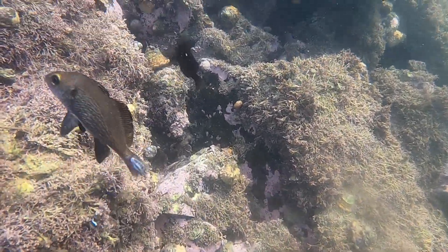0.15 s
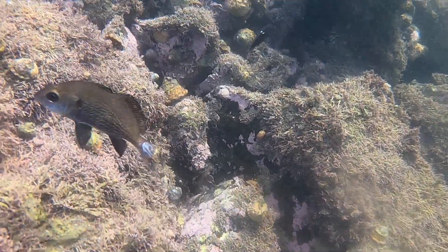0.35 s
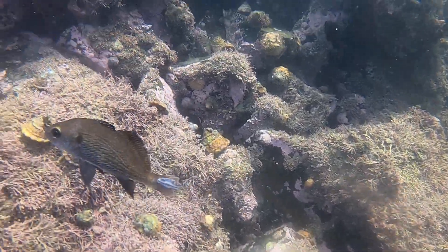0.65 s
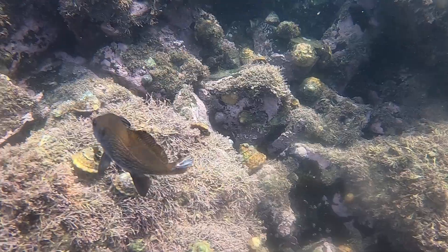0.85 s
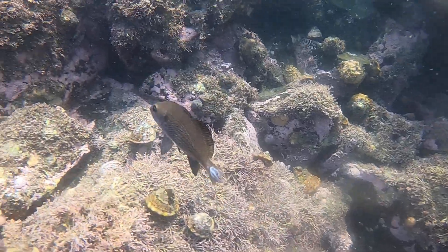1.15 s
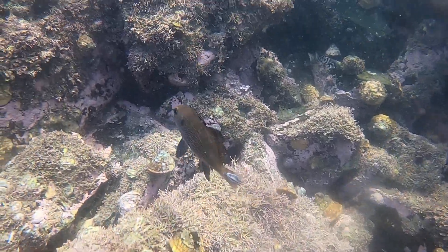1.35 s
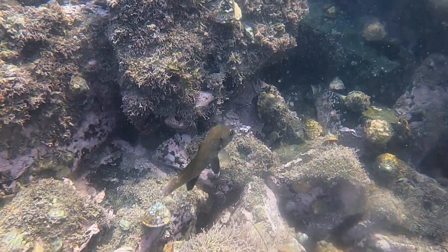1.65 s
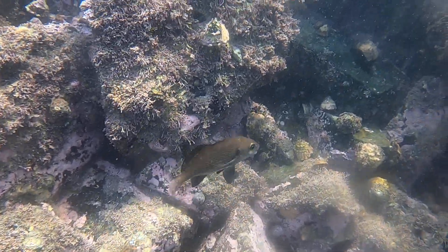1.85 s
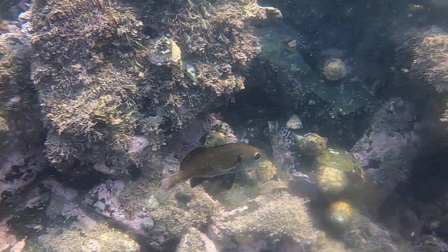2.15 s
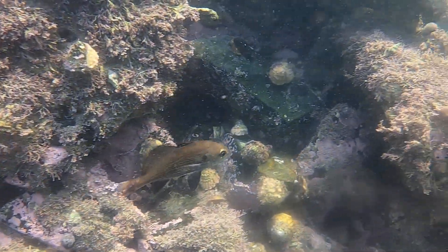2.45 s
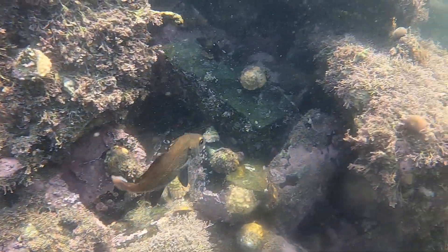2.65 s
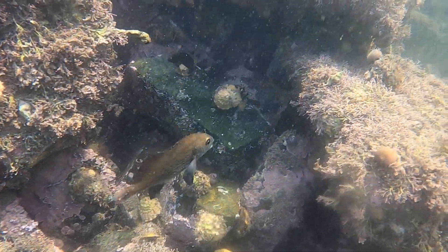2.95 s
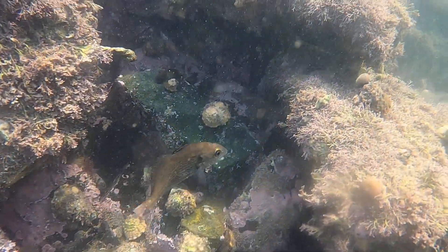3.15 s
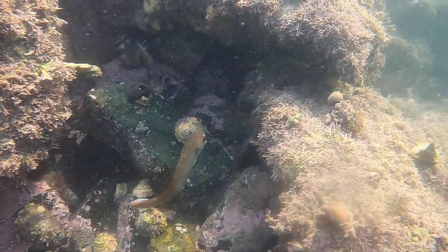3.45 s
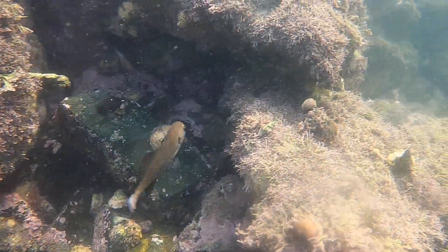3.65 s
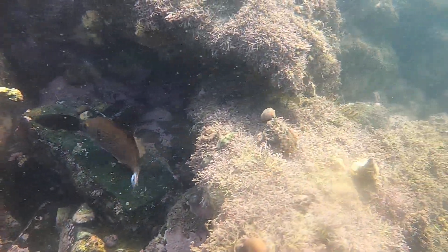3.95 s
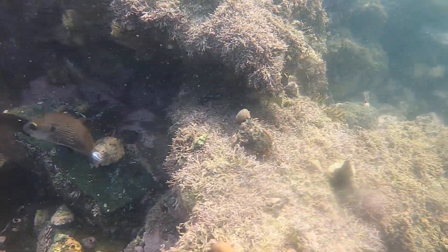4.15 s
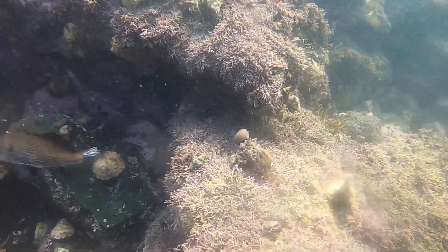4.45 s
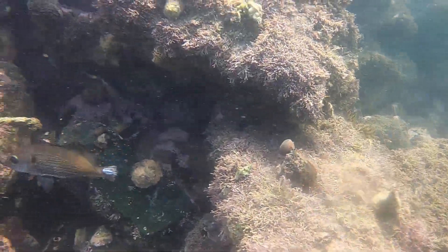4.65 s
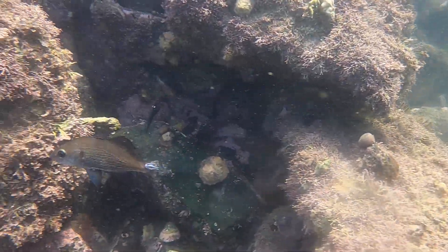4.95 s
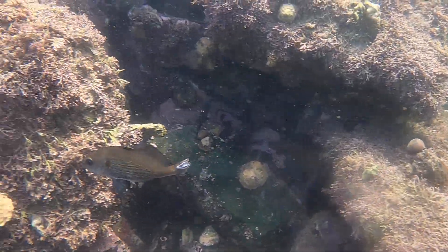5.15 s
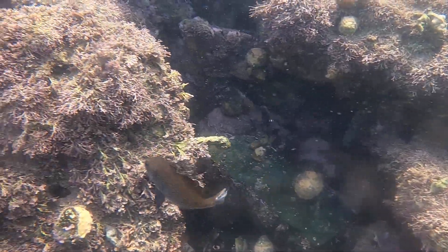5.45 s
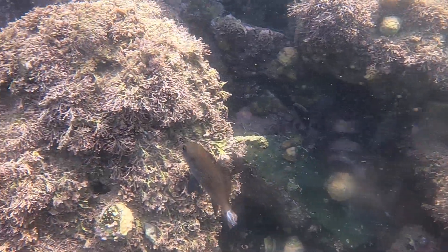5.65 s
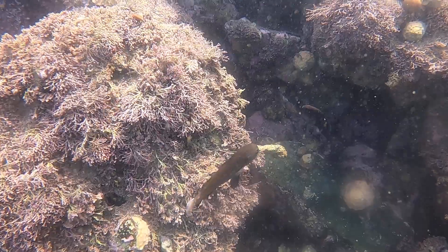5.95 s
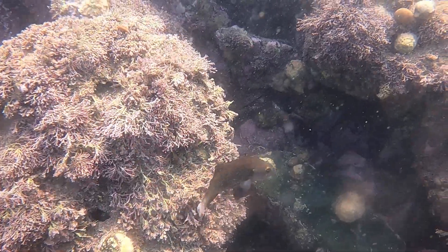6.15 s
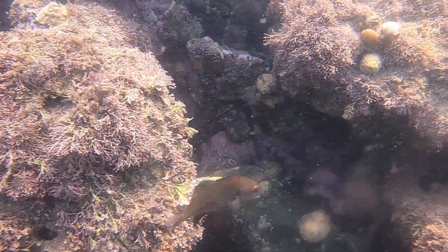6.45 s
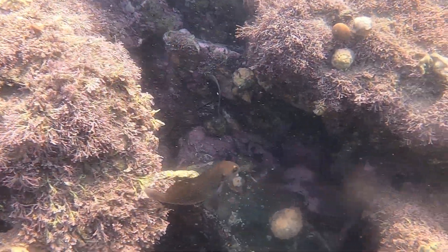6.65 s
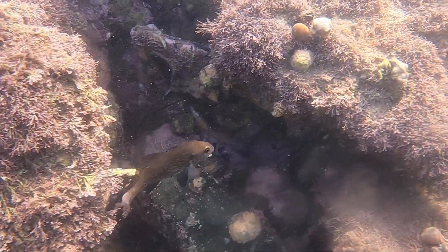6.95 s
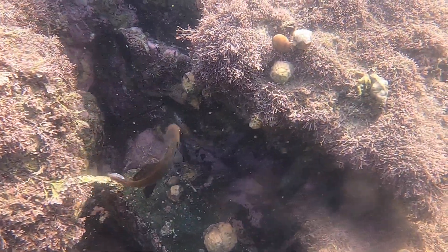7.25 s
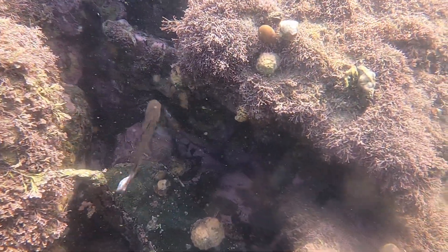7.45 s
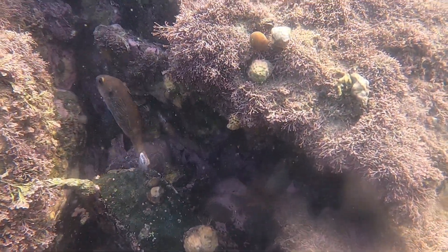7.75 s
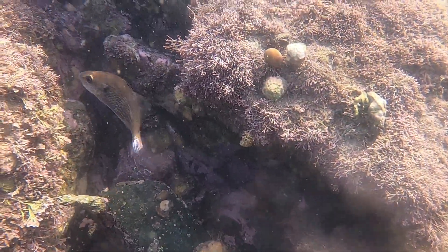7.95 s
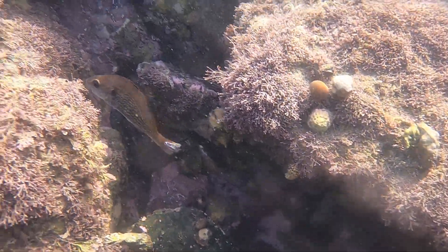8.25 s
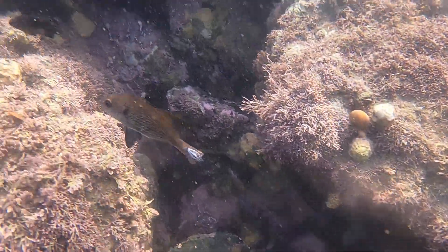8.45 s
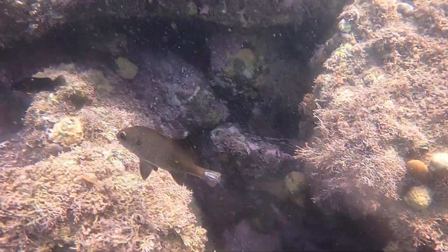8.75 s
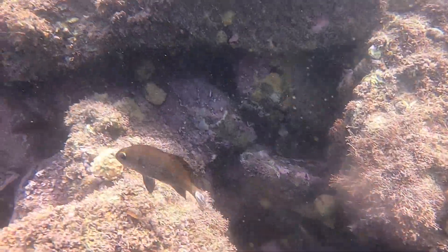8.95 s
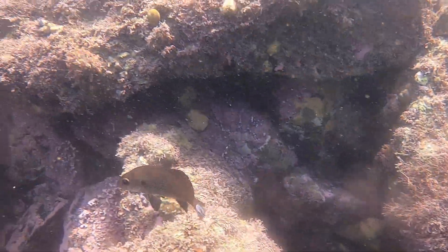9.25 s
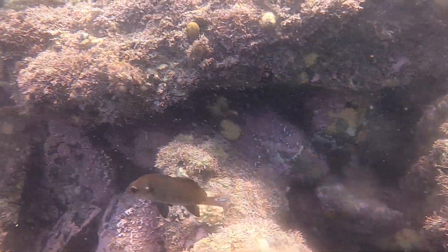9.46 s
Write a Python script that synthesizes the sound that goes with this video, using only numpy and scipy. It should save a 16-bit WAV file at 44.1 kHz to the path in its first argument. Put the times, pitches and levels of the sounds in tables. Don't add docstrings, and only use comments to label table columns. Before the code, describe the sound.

Muffled underwater reef ambience: dense irregular clicks, crackles and dull low knocks over a soft water rumble, with occasional hard slaps against the housing.

```python
import sys
import numpy as np
from scipy import signal
from scipy.fft import rfft, irfft
from scipy.io import wavfile

SR = 44100
rng = np.random.default_rng(int(sys.argv[2]) if len(sys.argv) > 2 else 0)


def transcribe(signal):
    frames = np.atleast_2d(signal).T
    limited = np.clip(frames, -1, 1)
    pcm = np.round(limited * 32767).astype(np.int16)
    wavfile.write(sys.argv[1], SR, pcm)


def volts_from_db(level):
    exponent = np.asarray(level, float) / 20
    return 10 ** exponent


N = 423360


def knocks(murmur_db, draw):
    # (time [s], peak level [dB], pitch [Hz], shell ring against
    # the peak [dB])
    single_fish = [(0.299, -23.5, 402, -17.5), (0.897, -21, 443, -22), (0.9851, -19.5, 487, -3.5),
                   (1.179, -14.5, 433, -6), (1.799, -24.5, 426, -15.5), (2.08, -24, 407, -29),
                   (2.184, -20, 452, -25), (2.48, -24, 436, -22), (2.524, -25, 434, -20),
                   (2.756, -18, 422, -30), (2.829, -24.5, 494, -22), (3.065, -24, 396, -18.5),
                   (3.085, -20.5, 423, -13), (3.405, -19.5, 410, -17.5), (3.558, -23.5, 422, -32),
                   (3.677, -23.5, 398, -14.5), (4.497, -24.5, 446, -34), (5.104, -26, 438, -46),
                   (5.413, -21.5, 442, -30), (5.466, -23, 445, -23), (5.503, -27, 428, -16),
                   (5.85, -20.5, 427, -21.5), (5.959, -20.5, 422, -30), (6.452, -24, 405, -16.5),
                   (6.797, -18, 424, -23), (7.011, -24, 413, -15), (7.727, -15.5, 389, -29),
                   (7.803, -21.5, 424, -20), (8.186, -29.5, 453, -38), (9.327, -19.5, 451, -20),
                   (1.922, -32, 483, -11.5), (2.558, -26.5, 452, -13), (2.952, -26.5, 467, -14),
                (3.241, -27.5, 445, -19), (3.753, -28.5, 447, -15), (4.244, -30, 443, -12),
                (4.473, -28, 410, -20), (4.562, -30.5, 390, -36), (4.889, -28, 425, -11.5),
                (4.905, -26, 430, -16), (5.201, -30.5, 432, -50), (5.389, -32, 454, -14),
                (5.456, -30.5, 446, -12.5), (5.642, -33, 436, -9), (5.655, -28.5, 450, -14),
                (6.594, -26.5, 467, -12), (6.992, -29, 480, -13), (7.201, -31.5, 409, -16),
                (7.707, -28.5, 458, -13), (7.907, -32.5, 446, -13), (7.969, -29.5, 460, -17),
                (8.124, -26, 436, -17.5), (8.374, -30, 452, -20), (8.772, -28, 444, -26),
                (8.971, -29.5, 426, -14.5), (9.11, -32.5, 450, -26), (9.155, -26.5, 449, -22.5),
                (9.389, -23, 439, -21), (9.416, -26, 438, -17), (9.483, -29.5, 440, -31)]
    # (time [s], peak level [dB])
    faint_fish = [(.136, -34), (.224, -39), (.279, -34.5), (.686, -39), (1.886, -36.5), (2.148, -34),
                  (2.303, -32), (2.409, -36.5), (2.659, -47.5), (3.369, -34), (3.814, -33), (3.883, -35.5),
                  (3.983, -31.5), (4.078, -36.5), (4.736, -32.5), (4.875, -37.5), (4.945, -36),
                  (5.931, -36), (6.12, -38), (6.309, -36), (6.573, -35.5), (6.633, -33.5), (6.948, -36.5),
                  (7.55, -36.5), (7.749, -33), (8.031, -34.5), (8.184, -28), (8.443, -33.5), (8.876, -33),
                  (9.517, -35.5)]
    # (time [s], peak level [dB], pitch [Hz])
    far_fish = [(0.045, -33.5, 423), (0.318, -26.5, 464), (0.388, -28, 407), (0.404, -30.5, 412),
                (0.559, -28, 470), (0.602, -30.5, 440), (0.657, -29, 456), (3.038, -34, 510),
                (0.823, -31, 435), (1.015, -33.5, 434), (1.04, -40, 448), (1.09, -33.5, 406),
                (1.289, -33, 420), (1.465, -33.5, 450), (1.597, -34.5, 445), (2.271, -39, 403),
                (2.498, -34, 434), (2.511, -32.5, 438), (2.613, -33.5, 445), (2.66, -33, 457),
                (2.735, -30.5, 416), (2.776, -31, 442), (2.802, -36, 418), (3.256, -24.5, 465),
                (3.289, -31, 446), (3.693, -23, 426), (3.896, -36, 390), (3.939, -32, 534),
                (3.961, -34, 387), (4.008, -33, 441), (4.326, -35, 375), (4.428, -34.5, 467),
                (4.514, -35, 414), (4.589, -27.5, 392), (4.788, -32.5, 420), (4.845, -31, 434),
                (4.983, -34, 390), (5.061, -30, 430), (5.26, -30, 427), (5.512, -21.5, 474),
                (6.057, -32, 450), (6.406, -31, 448), (6.427, -32.5, 425), (6.722, -33.5, 443),
                (6.766, -34, 468), (6.892, -38, 445), (7.084, -35.5, 450), (7.157, -32.5, 414),
                (7.293, -35.5, 390), (7.399, -38, 470), (7.486, -34.5, 422), (8.099, -34, 450),
                (8.239, -35, 454), (8.279, -31, 480), (8.322, -43, 460), (8.345, -32, 470),
                (8.399, -29.5, 400), (8.483, -30.5, 457), (9.184, -29.5, 400), (9.403, -32, 480)]
    # (time [s], peak level [dB], pitch [Hz], swell [ms])
    water_slaps = [
        (0.986, -29, 300, 0.56),
        (0.9856, -17.5, 810, 0.33),
        (1.1797, -17.5, 850, 0.28),
        (1.179, -22.5, 263, 0.65),
        (1.183, -23.5, 430, 0.98),
        (2.6, -35, 262, 1.9),
        (6.794, -28, 239, 1.86),
        (7.7224, -11.5, 205, 1.5),
    ]
    # (pitch [Hz], t60 [s], left level [dB], right level [dB], right sign)
    shell_modes = [(682, 0.015, 5.5, -0.5, 1), (796, 0.016, -4, -14.5, 1), (892, 0.033, -10, -17.5, 1),
                   (1030, 0.0061, -4, -7, -1)]
    faint_hz, faint_shell_db = 440, -19
    hard_shortens = 0.92

    times, levels = crowd(murmur_db - 9.0, spread_db=5.5, draw=draw, nearest=0.11)
    voice = rng.random((len(times), 2))
    pitch_hz = 375 + 140 * voice[:, 0]
    swell_ms = 0.58 + 1.52 * voice[:, 1]
    murmur = np.column_stack([times, levels, pitch_hz, swell_ms])

    faint = with_columns(faint_fish, faint_hz, faint_shell_db)
    distant = [(s, db - 5.0, hz, faint_shell_db) for s, db, hz in far_fish]
    s, db, hz, shell_db = np.transpose(single_fish + faint + distant)
    hardness = hard_shortens * volts_from_db(np.minimum(shell_db, -4))
    swell_ms = 560 / hz * (1 - hardness)
    single = np.column_stack([s - .0012, db + 9.0, hz, swell_ms])
    slaps = np.array(water_slaps) + [-.001, 3, 0, 0]

    x = wavelets(np.vstack([single, slaps, murmur]), fall=1.0)
    for lag_s, echo_db in [(.011, -21), (.019, -27), (.031, -27)]:
        x = x + volts_from_db(echo_db) * np.roll(x, round(lag_s * SR))
    dull = signal.sosfiltfilt(signal.butter(1, 1000, fs=SR, output="sos"), x)
    hit_times = np.r_[s + .001, times]
    hit_db = np.r_[db + shell_db + 3.0, levels - 24.0]
    shell = strike(hit_times, hit_db, shell_modes, (600, 1300),
                   spray_t60=0.02, spray_db=-21.0, bed=volts_from_db(murmur_db - 62.5))
    return shell + deeper([volts_from_db(1.2) * x, dull])


def wavelets(rows, fall):
    tail_pace = 0.86
    length = 1400
    out, t = np.zeros(N + length), np.arange(length) / SR
    for s, db, hz, swell_ms in rows:
        u = t / (np.clip(swell_ms, .2, 2.8) / 1000)
        u = np.where(u > 4, 4 + tail_pace * (u - 4), u)
        shape = (u / 4) ** 4 * np.exp(4 - u - (u / 9) ** 4)
        tone = np.sin(2 * np.pi * hz * t * (1 - fall * t))
        at = max(round(s * SR), 0)
        out[at:at + length] -= volts_from_db(db) * shape * tone
    return out[:N]


def snaps(crackle_db, draw):
    # (time [s], peak level [dB], then against it: low [dB], high [dB] and top modes [dB])
    near_shrimp = [(0.055, -37, -18, -12, -28), (0.9854, -15.5, 2, -14.5, -36.5),
                   (1.1362, -33.5, -1, -14, -25.5), (1.1801, -19.5, 1, -11, -33),
                   (1.269, -28.5, -3, -13, -42), (1.798, -28, -3.5, -10, -43), (2.2995, -41, -3, -14, -44),
                   (2.481, -32, -3.5, -12.5, -56), (2.589, -47, -6, -6, -26),
                   (3.3711, -19.5, -8.5, -20, -37.5), (3.559, -33.5, -8, -21, -37),
                   (3.671, -16.5, -15, -32, -43), (3.697, -25, -10, -14.5, -44),
                   (3.7608, -39.5, -8, -11, -29), (3.941, -34.5, -11.5, -9, -30),
                   (4.6664, -33.5, -6, -12, -28), (5.293, -50, -14, 8, -9), (5.5, -36, -6, -7, -29),
                   (5.9282, -25.5, -7.5, -17.5, -39), (7.2906, -33.5, -3, -26, -47),
                   (7.7262, -30, 3, -4, -29), (9.1528, -34.5, -11, -13.5, -38), (9.3111, -32, -5, -18, -26),
                   (9.3262, -32, 10.5, -8.5, -51)]
    # (time [s], peak level [dB], low modes against it [dB])
    crisp_shrimp = [(.3152, -40, 0.5), (1.094, -41, -7), (1.538, -40.5, -30), (2.1864, -57, 19),
                    (2.467, -36, -7), (2.5085, -40, -1.5), (3.063, -46.5, -6), (3.237, -50, -21),
                    (3.9843, -35.5, -8), (4.1884, -32.5, -9.5), (4.246, -36, -4), (4.7354, -43, 8.5),
                    (4.9432, -45, 2), (5.2011, -35, -1), (5.3872, -36, 0.5), (5.4146, -32.5, -7),
                    (5.464, -35, -3), (5.6027, -36.5, -0.5), (5.6415, -35.5, -4.5), (5.6915, -46.5, 8),
                    (5.8481, -48, 6.5), (6.4525, -35.5, -3.5), (6.5906, -34, -3.5), (6.7627, -50, 0),
                    (6.9908, -35.5, -17), (7.5876, -44, -3), (7.306, -31, -6), (7.9056, -35.5, -5.5),
                    (7.9673, -37, -11), (8.1217, -34, -16), (9.1202, -41.5, 0)]
    # (time [s], peak level [dB], low modes against it [dB])
    dull_shrimp = [(.2798, -35.5, -11), (.5541, -38.5, -11.5), (.635, -38, -5), (.6569, -44, -17),
                   (.6998, -33, -11), (.818, -37.5, -18), (1.4112, -33, -3), (2.0807, -46.5, 3),
                   (2.558, -42.5, 9.5), (2.6897, -42.5, -8), (2.7559, -32, -5), (2.83, -35.5, 1.5),
                   (2.9502, -38.5, -6), (4.0143, -38, -4), (4.37, -32.5, -13), (4.414, -43, -5),
                   (4.8882, -39, -4), (5.7215, -40, -7), (6.4775, -43.5, -1), (6.7985, -36, 3),
                   (7.197, -35.5, -18), (7.326, -44, -8), (1.214, -37, -4), (7.472, -45, -6),
                   (8.1728, -41, 1.5), (8.2571, -45, -2), (8.3462, -40, -5)]
    # (time [s], peak level [dB])
    deep_shrimp = [(8.372, -53), (.5843, -49), (.8634, -40.5), (.898, -50), (1.923, -40.5), (3.0859, -49.5),
                   (3.2894, -50.5), (3.4037, -44), (4.3246, -50), (4.469, -44), (4.787, -50.5),
                   (4.9063, -41), (5.366, -45.5), (6.9599, -45.5), (7.7039, -46), (7.9922, -43.5),
                   (8.006, -47), (8.0296, -45), (8.528, -52), (9.4863, -47)]
    # (time [s], peak level [dB], low modes against it [dB])
    far_shrimp = [(0.135, -48, -6.2), (8.805, -50, -10), (0.759, -45, -10), (3.609, -46, -11),
                  (0.657, -35, -9), (0.6861, -44, -14), (0.8971, -50, 3), (0.9751, -46, 8),
                  (1.0402, -48, 2), (1.8545, -43, -10), (2.0318, -48, -3), (2.148, -45, -20),
                  (2.1995, -46, 0), (2.2661, -49, -3), (2.3228, -42, -12), (2.5274, -40, -8),
                  (2.5969, -44, -3), (4.159, -49, -12), (2.7834, -48, -9), (3.2386, -38, -21.7),
                  (3.2568, -56, 7), (3.4596, -47, -2), (3.6278, -44.9, -16), (4.1431, -38, -22),
                  (4.4316, -58, 11.5), (4.4981, -43, -2), (4.5636, -47, 0.5), (4.592, -44, -17),
                  (5.2215, -39.5, -10), (5.249, -42, -13), (5.655, -41, -9), (5.5111, -31, -9.5),
                  (5.5338, -43.7, -9.1), (5.5513, -49.5, -10), (5.6292, -37, -3), (6.0386, -46.5, -6),
                  (6.1198, -47, -4), (6.633, -46, -3), (6.4199, -39.5, -11), (7.624, -46, -9),
                  (6.764, -46, -12), (7.0854, -49, 7.5), (7.4057, -45, -22), (7.5501, -48, 2),
                  (8.099, -43.5, -12), (8.1406, -41.5, -7), (8.1868, -49, -3), (8.2792, -40.5, -13),
                  (8.5507, -44, -17.7), (8.8404, -47, -26.5), (9.0658, -40, -17), (9.1112, -44, -1),
                  (9.1541, -40, -17), (9.175, -40, -10), (9.1845, -47, -6.5), (9.3738, -43, -23),
                  (9.3895, -44, -5), (9.416, -44.5, 1), (8.957, -46.5, -10), (9.5165, -49, -9)]
    # (pitch [Hz], t60 [s], left level [dB], right level [dB], right sign)
    port_families = [
        [(1221, 0.023, -13.5, -26.5, 1), (1470, 0.0039, -28.5, -1.5, -1), (1472, 0.021, -3.5, -11, -1),
         (1733, 0.014, -0.5, -3, 1), (1930, 0.0057, -9, -8.5, 1)],
        [(2175, 0.0096, -7, -12.5, 1), (2527, 0.013, -3.5, -8, 1), (2745, 0.011, -2.5, -6.5, 1),
         (3170, 0.011, -2.5, -8, 1), (3462, 0.0065, -2.5, -15.5, -1)],
        [(4190, 0.004, -8.5, -6, 1), (4886, 0.0037, 2.5, 4.5, -1), (4862, 0.02, -19, -4.5, -1)],
        [(5620, 0.0093, -9.5, -10, -1), (6290, 0.0079, -23, -12.5, -1), (8300, 0.004, -28, -36, 1),
         (7600, 0.004, -17.5, -37, 1)],
    ]
    # (low edge [Hz], high edge [Hz])
    family_bands = [(1000, 2300), (1900, 3800), (3700, 5600), (5200, 9200)]

    near = np.array(near_shrimp
                    + with_columns(crisp_shrimp, -13, -39)
                    + with_columns(dull_shrimp, -33.5, -48)
                    + with_columns(deep_shrimp, 6, -25, -42)
                    + with_columns(far_shrimp, -16, -42.5))
    far_times, far_db = crowd(crackle_db - 14.0, spread_db=6.0, draw=draw, nearest=0.055)
    times = np.r_[near[:, 0], far_times + .003]
    colours_db = [near[:, 2] + 4.45, 0, near[:, 3] + 10.0, near[:, 4] + 32.0]
    sprays_t60 = [.036, .032, .024, .018]
    bed = volts_from_db(crackle_db - 21.5)
    out = 0
    for k, (modes, edges) in enumerate(zip(port_families, family_bands)):
        varied_far_db = far_db + 5.0 * rng.standard_normal(len(far_db))
        db = np.r_[near[:, 1] + colours_db[k] - 8.0, varied_far_db]
        family = strike(times, db, modes, edges, sprays_t60[k], spray_db=-19.0, bed=bed)
        out = out + (deeper(family) if k == 1 else family)
    return out


def strike(times, db, modes, edges_hz, spray_t60, spray_db, bed):
    mode_scatter_db = 6
    own_spray = 0.95
    rise, fade = volts_from_db(-60 / (.003 * SR)), volts_from_db(-60 / (spray_t60 * SR))
    poles = np.convolve([1, -rise], [1, -fade])
    swell = signal.lfilter([1 - rise], poles, train(times, volts_from_db(db)) + 1e-18)
    echoes = rng.standard_normal(N) + own_spray * rng.standard_normal((2, N))
    spray = echoes * (volts_from_db(spray_db) * swell + bed)
    out = 0
    for k, (hz, t60, left_db, right_db, sign) in enumerate(modes):
        cracks = train(times, volts_from_db(db + mode_scatter_db * rng.standard_normal(len(times))))
        t60 = np.clip(t60, .003, min(.036, 60 / hz))
        ports = [[volts_from_db(left_db)], [np.sign(sign) * volts_from_db(right_db)]]
        out = out + (-1) ** k * ring(cracks + spray, hz, t60) * ports
    return signal.sosfilt(signal.butter(3, edges_hz, "band", fs=SR, output="sos"), out)


def rings():
    # (time [s], peak level [dB], pitch [Hz], t60 [s])
    lone_modes = [
        (0.9868, -17, 1483, 0.04),
        (1.178, -26, 1400, 0.014),
        (2.83, -28.5, 1840, 0.018),
        (3.3746, -28, 2420, 0.013),
        (3.6695, -24.5, 1920, 0.019),
        (5.9273, -32, 1747, 0.033),
    ]
    out = 0
    for s, db, hz, t60 in lone_modes:
        right = -volts_from_db(-14.0) if hz < 1600 else volts_from_db(-2.0)
        pair = ring(train([s], [volts_from_db(db)]), hz, t60) * [[volts_from_db(4.0)], [right]]
        out = out + (deeper(pair) if hz > 1900 else pair)
    return signal.sosfilt(signal.butter(2, 3000, fs=SR, output="sos"), out)


def ticks():
    # (time [s], peak level [dB])
    bright_ticks = [(0.985, -53), (1.175, -66), (1.7366, -64), (1.799, -62.5), (2.0557, -66.5),
                    (2.2653, -60.5), (2.3233, -60.5), (6.3, -66), (2.599, -71), (2.988, -56),
                    (7.906, -65.5), (4.246, -68), (3.3707, -59.5), (9.153, -65), (3.671, -56.5),
                    (3.9047, -66), (3.9, -66.5), (4.138, -57.5), (4.6655, -75), (9.082, -64.5),
                    (5.503, -67), (6.7, -66), (7.309, -68), (7.8, -57), (7.995, -64.5),
                    (0.289, -67.5), (0.318, -66), (1.4772, -68), (1.7985, -57.5), (2.4785, -69.5),
                   (2.5968, -67.5), (2.757, -64.5), (2.7735, -75.5), (2.8652, -65), (3.0673, -64),
                   (3.2409, -65.5), (3.561, -65), (3.9021, -63.5), (4.587, -64.5), (4.6769, -70),
                   (4.8531, -64.5), (4.9442, -66), (5.27, -62), (5.393, -63), (5.4474, -70), (5.5118, -61),
                   (5.6945, -62.5), (5.7695, -69), (5.7905, -62.5), (6.4, -64), (6.927, -65),
                   (6.9498, -67.5), (7.569, -62), (9.334, -69), (9.4314, -63.5)]
    s, db = np.transpose(bright_ticks)
    fade = volts_from_db(-60 / (0.06 * SR))
    burst = signal.lfilter([1], [1, -fade], train(s, volts_from_db(db - 10.0)) + 1e-18)
    common, own = rng.standard_normal(N), rng.standard_normal((2, N))
    fizz = volts_from_db(-104)
    bright = (burst + fizz) * (common + 2.1 * own) * volts_from_db([[2.6], [-2.6]])
    return signal.sosfilt(signal.butter(3, [6000, 10000], "band", fs=SR, output="sos"), bright)


def surge(surge_db):
    # (frequency [Hz], level per Hz [dB])
    rumble_curve = [(8.8, -34), (15, 5), (38, 1), (69, -4), (101, -10), (166, -25), (201, -25), (249, -25),
                    (300, -22), (390, -53), (660, -120)]
    hz = np.maximum(np.fft.rfftfreq(N, 1 / SR), 1)
    points = np.array(rumble_curve)
    gain = volts_from_db(np.interp(np.log(hz), np.log(points[:, 0]), points[:, 1]))
    mid, side = irfft(rfft(rng.standard_normal((2, N))) * gain, N)
    pair = mid + volts_from_db(-23) * side * [[1], [-1]]
    return volts_from_db(surge_db - 2.0) * rms_one(pair) * volts_from_db([[.4], [-.4]])


def engine(hum_db):
    overtone_db = -60.5 + 0.4 * (hum_db - hum_db.mean())
    hum = volts_from_db(hum_db - 5.0) * wavering_line(86.4)
    overtone = volts_from_db(overtone_db) * wavering_line(158.4)
    return (hum + overtone) * volts_from_db([[.3], [-.3]])


def wavering_line(hz):
    width_hz, throb_depth_db = 1.3, 2.5
    steps = np.arange(N) / SR * 5
    drift = np.interp(steps, np.arange(60), rng.standard_normal(60))
    throb_db = np.interp(steps, np.arange(60), throb_depth_db * rng.standard_normal(60))
    return volts_from_db(throb_db) * np.sin(2 * np.pi * np.cumsum(hz + width_hz * drift) / SR)


def crowd(level_db, spread_db, draw, nearest):
    moment, distance = draw[:, 0] * N, np.maximum(draw[:, 1], nearest)
    return moment / SR, level_db[moment.astype(int)] - spread_db * np.log(distance)


def ring(x, hz, t60):
    r, w = volts_from_db(-60 / (t60 * SR)), 2 * np.pi * hz / SR
    return signal.lfilter([0, np.sin(w)], [1, -2 * r * np.cos(w), r * r], x + 1e-18)


def train(times, sizes):
    at = np.clip((np.asarray(times) * SR).astype(int), 0, N - 1)
    return np.bincount(at, sizes, N)


def deeper(x):
    lag = 3
    return np.array([np.pad(x[0], (lag, 0), "edge")[:N], x[1]])


def with_columns(rows, *values):
    return [(*row, *values) for row in rows]


def rms_one(x):
    return x / np.sqrt(np.mean(x ** 2) + 1e-20)


def in_time(rows):
    s, *columns = np.transpose(rows)
    return [np.interp(np.arange(N) / SR, s, c) for c in columns]


def scene():
    # (time [s], knock murmur level [dB], crackle level [dB])
    reef_curve = [(0.0, -38.5, -65), (1.2, -37, -66.5), (1.63, -43, -66.5), (2.73, -35.5, -66),
                  (3.18, -39, -67.5), (4.09, -39, -65.5), (5.5, -38.5, -65.5), (6.2, -40, -66.5),
                  (7.6, -39, -65.5), (8.3, -38.5, -66.5), (8.65, -41.5, -67.5), (9.6, -37, -65)]
    # (time [s], surge level [dB], hum level [dB])
    water_curve = [(0.0, -32.5, -41.5), (1.52, -34, -35), (1.79, -33, -52.5), (2.32, -34.5, -33),
                   (2.57, -34.5, -43), (3.6, -33.5, -37.5), (3.9, -35.5, -35.5), (4.46, -29, -33.5),
                   (4.7, -33, -42), (5.6, -34, -42.5), (7.25, -36, -42.5), (7.48, -33, -32),
                   (7.75, -29, -34.5), (8.0, -34.5, -35.5), (9.47, -31, -48.5), (9.6, -42, -54)]
    murmur_db, crackle_db = in_time(reef_curve)
    surge_db, hum_db = in_time(water_curve)
    far = rng.random((3200, 2))
    animals = knocks(murmur_db, far[:2100]) + snaps(crackle_db, far[1000:]) + ticks() + rings()
    return animals + deeper(surge(surge_db) + engine(hum_db))


def top_cut(x):
    return signal.sosfilt(signal.butter(12, 13000, fs=SR, output="sos"), x)


def record(dry):
    hiss = volts_from_db(-103) * rng.standard_normal(dry.shape)
    edges = np.interp(np.arange(N), [0, 200, N - 200, N], [.5, 1, 1, 0])
    return top_cut(edges * dry + hiss)


dry = scene()
out = record(dry)
transcribe(out)
```